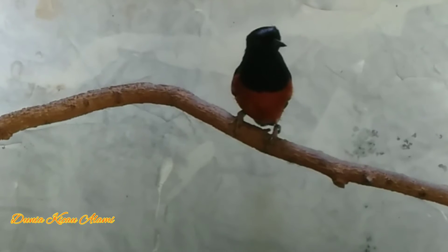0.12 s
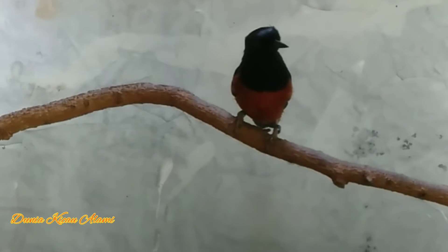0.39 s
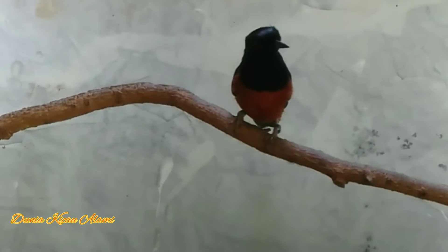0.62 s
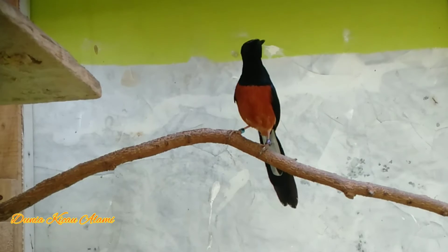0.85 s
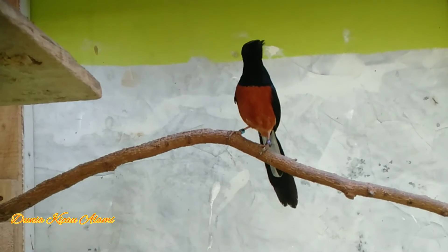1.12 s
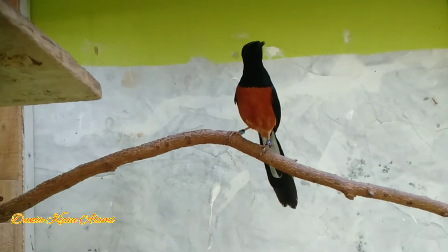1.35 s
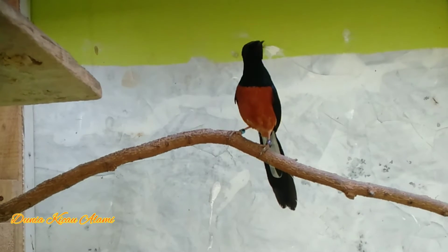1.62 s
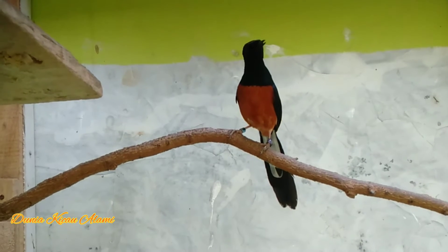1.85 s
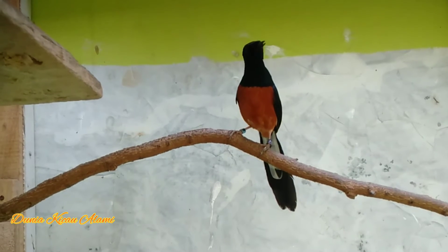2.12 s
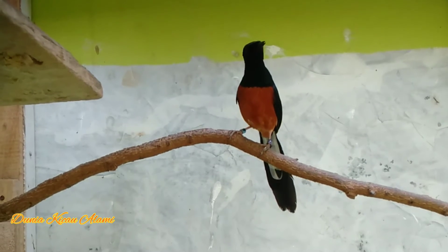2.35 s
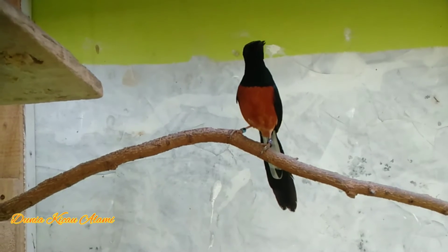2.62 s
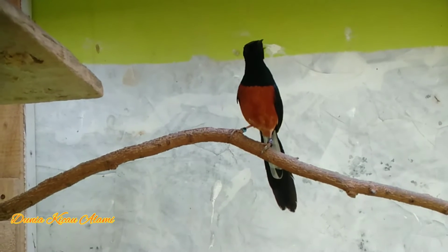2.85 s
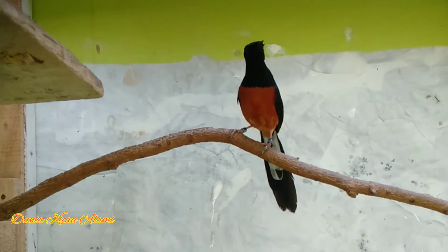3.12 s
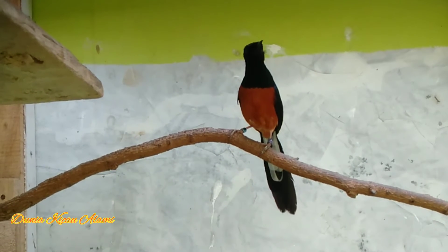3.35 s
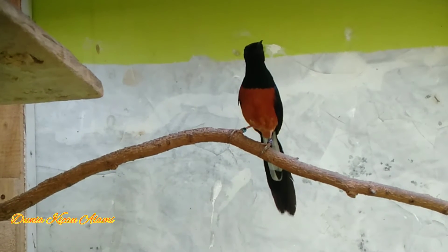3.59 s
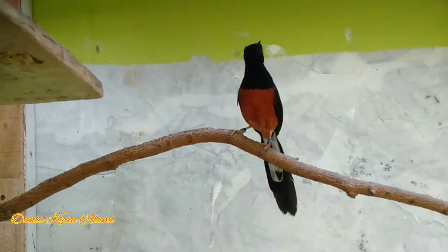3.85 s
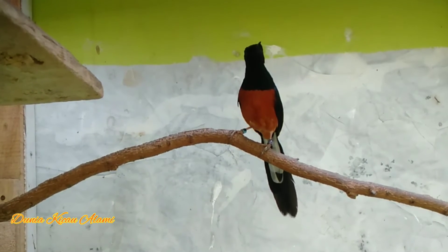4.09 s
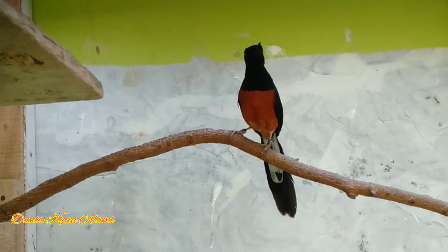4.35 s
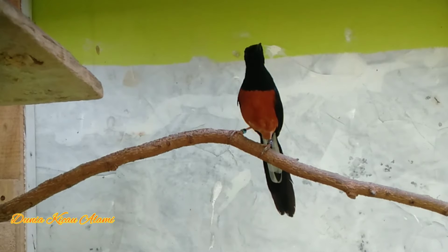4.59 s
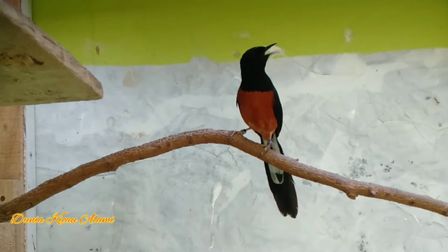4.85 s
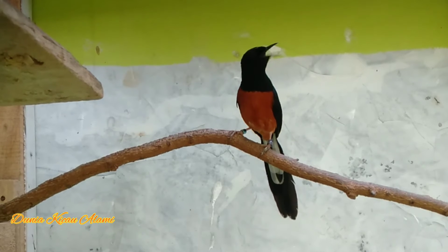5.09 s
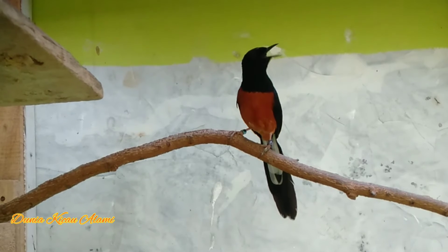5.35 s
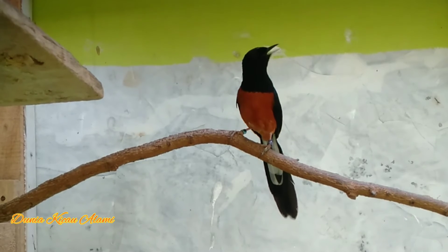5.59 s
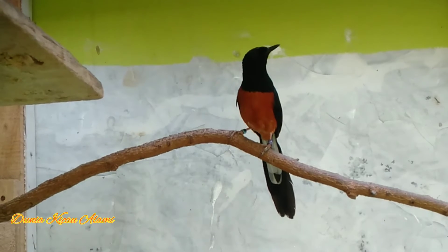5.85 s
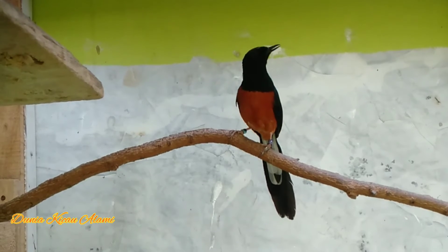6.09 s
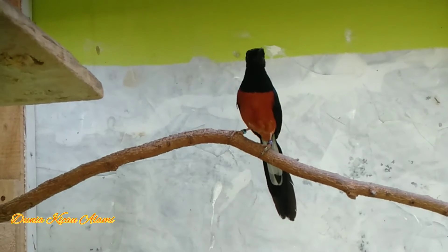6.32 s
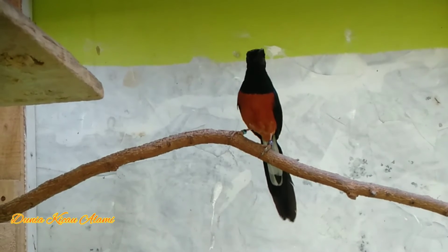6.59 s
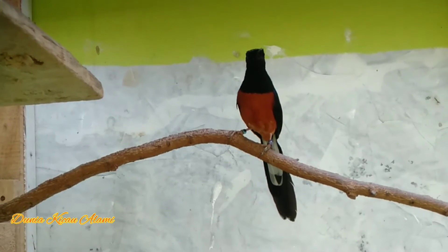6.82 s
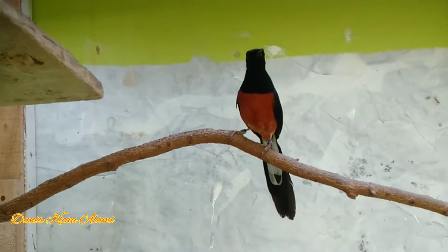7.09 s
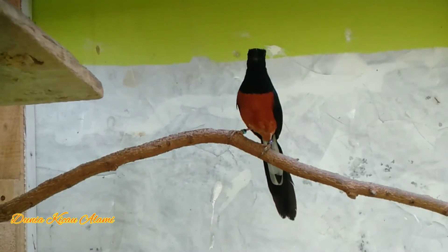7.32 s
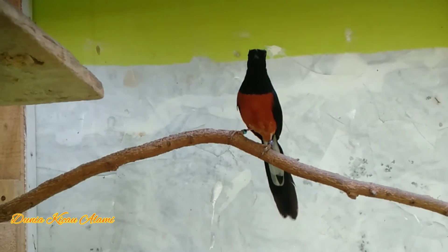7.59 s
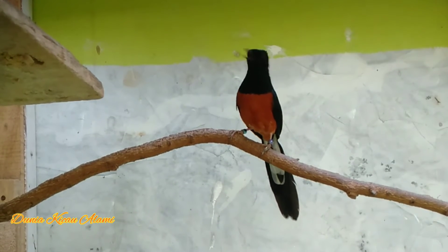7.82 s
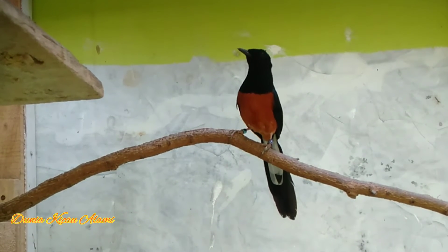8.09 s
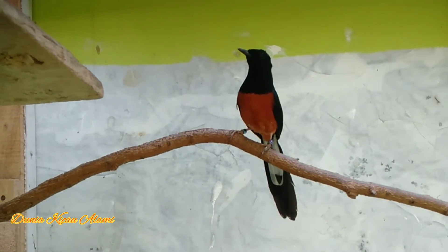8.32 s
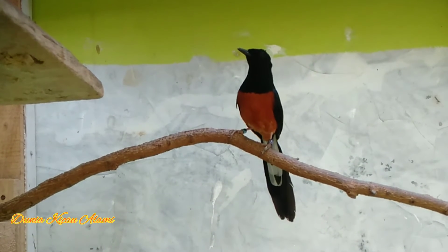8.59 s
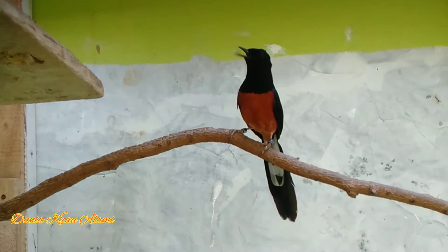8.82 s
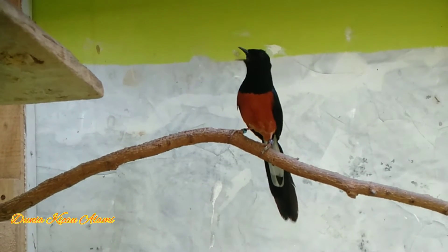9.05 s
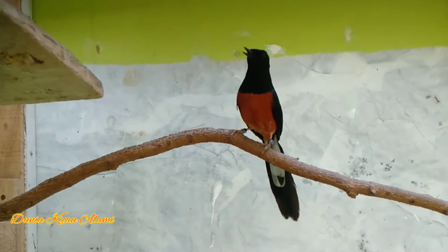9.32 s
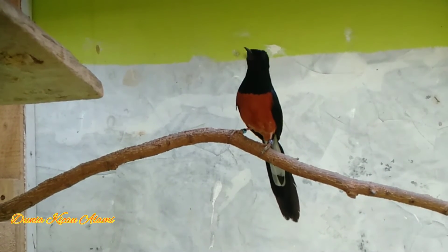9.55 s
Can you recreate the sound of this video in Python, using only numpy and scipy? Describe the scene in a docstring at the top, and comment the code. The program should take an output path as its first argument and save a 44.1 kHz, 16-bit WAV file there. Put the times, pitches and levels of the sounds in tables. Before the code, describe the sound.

Loud shama song indoors: piercing downward chirps, then five rattling trills of tiny arched whistles, slightly overdriven, over faint rumble and hiss.

```python
"""A caged songbird sings close to a small microphone in a hard-walled room: first a run of falling chips,
then five trills of short whistles that arch up and down in pitch. Its notes are stacked sine partials,
shaped by throat and beak and given echoes; the loudest overdrive the microphone. Far off are faint whistles
of two gliding partials, soft thuds and scuffs of fading noise, and a bed of rumble, drone, murmur and hiss."""
import sys
import numpy as np
from scipy import signal
from scipy.fft import rfft, irfft, next_fast_len
from scipy.io import wavfile
from scipy.ndimage import uniform_filter1d, map_coordinates

SR = 44100
rng = np.random.default_rng(int(sys.argv[2]) if len(sys.argv) > 2 else 0)


def invert_db(x):
    """Field ratio 10**(x/20) for x, a level in decibels (scalar or array-like)."""
    u = np.asarray(x, float) / 20
    return 10 ** u


def store_pcm(level_fs):
    """Save levels as 16-bit WAV."""
    pcm = np.round(np.clip(level_fs, -1, 1) * 32767).astype(np.int16)
    wavfile.write(sys.argv[1], SR, np.atleast_2d(pcm).T)


N = 427329

# Falling chips: (start of the slide [s], level before trim [dB])
CHIP_NOTES = [(0.732, -21), (0.84, -19.5), (0.947, -19.5), (1.048, -18), (1.153, -18), (1.258, -19),
              (1.371, -17.5), (1.483, -17.5), (1.576, -16.5), (1.682, -15.5), (1.789, -14.5), (1.878, -14),
              (1.967, -15), (2.056, -15.5), (2.144, -14.5), (2.246, -14.5), (2.356, -15.5), (2.531, -15),
              (2.627, -13.5), (2.729, -13), (2.826, -13.5), (2.906, -14), (2.983, -14), (3.058, -15),
              (3.133, -12.5)]
# Starting pitch over the run, before scatter; it rises, then sinks toward the trill: (time [s], pitch [Hz])
CHIP_START_PITCH = [(.73, 6230), (.95, 6650), (1.3, 6860), (1.9, 7070), (2.73, 7000), (2.95, 6440),
                    (3.13, 5750)]
# Chips that slide on a little further: (index counted from 0)
DEEP_CHIP_INDEX = [7, 9, 13, 16, 17]
# Chip overtones, before scatter: (multiple of the pitch, level [dB])
CHIP_PARTIALS = [(2, -13.5), (3, -19), (4, -46)]
# Soft thin notes of the bird, some of them the catch that opens a trill:
# (start of the slide [s], level [dB], from pitch [Hz], to pitch [Hz], slide length [ms])
PEEP_NOTES = [(.525, -58, 6760, 6600, 51), (.54, -60, 7350, 6720, 126), (.57, -67, 5830, 4560, 250),
              (4.883, -58.5, 2970, 1960, 28), (4.89, -52.5, 3440, 3400, 13), (6.06, -72.5, 6470, 4240, 69),
              (6.168, -62, 3460, 2020, 10), (7.247, -58.5, 2430, 3600, 6.9), (8.685, -59, 2710, 2840, 9.8)]
# Trill notes: (time of the loudness crest [s], level before trim [dB])
TRILL_NOTES = [(3.214, -8.5), (3.275, -9), (3.327, -7.5), (3.379, -9), (3.423, -9), (3.472, -10),
               (3.523, -9.5), (3.577, -11.5), (3.632, -11.5), (3.691, -11), (3.749, -10), (3.805, -10),
               (3.865, -9.5), (3.924, -11), (3.983, -11), (4.043, -10), (4.101, -10.5), (4.161, -10.5),
               (4.217, -11), (4.278, -11), (4.343, -10), (4.406, -12), (4.905, -11), (4.945, -8.5),
               (4.991, -10), (5.039, -10), (5.087, -8.5), (5.138, -8.5), (5.192, -8.5), (5.245, -9),
               (5.3, -9.5), (5.36, -9.5), (5.414, -9), (5.478, -10), (5.538, -10), (5.603, -9),
               (5.664, -11.5), (6.19, -8.5), (6.235, -7.5), (6.276, -14.5), (6.322, -8.5), (6.371, -8),
               (6.421, -6.5), (6.476, -7), (6.529, -6.5), (6.588, -8), (6.644, -6), (6.7, -7.5),
               (6.76, -10.5), (6.813, -11), (6.895, -16), (7.272, -9.5), (7.322, -9.5), (7.369, -9),
               (7.416, -8.5), (7.463, -7.5), (7.513, -9.5), (7.568, -11), (7.622, -10.5), (7.686, -10.5),
               (7.744, -9.5), (7.805, -9), (7.869, -10.5), (8.706, -9), (8.757, -8.5), (8.804, -5),
               (8.856, -5), (8.908, -7), (8.957, -7), (9.008, -8.5), (9.059, -8), (9.119, -9), (9.174, -8),
               (9.233, -7), (9.292, -9), (9.349, -10.5), (9.409, -10), (9.475, -10), (9.542, -11),
               (9.602, -9.5), (9.671, -12)]
# Melody of each trill, mostly sagging as the breath runs out; pitch before scatter, times before stretching:
# (time [s], crest pitch [Hz], rise time [ms], fall time [ms])
TRILL_MELODIES = [
    [(3.215, 4805, 9, 16), (3.277, 4520, 11, 15.6), (3.4, 4450, 15, 14.3), (3.52, 4257, 15, 11.4),
     (3.8, 4142, 14, 14), (4.41, 4001, 11, 17.2)],
    [(4.905, 4736, 20, 13.3), (5.04, 4698, 19, 16.3), (5.089, 4820, 15, 10.4), (5.137, 4483, 13, 10.7),
     (5.36, 4390, 10, 12), (5.663, 4232, 14, 8.5)],
    [(6.19, 4974, 21, 14.2), (6.32, 4760, 21, 13.1), (6.53, 4510, 8.5, 10.5), (6.645, 4496, 9.1, 9.6),
     (6.76, 4267, 17, 9), (6.895, 4102, 14, 14.7)],
    [(7.272, 4240, 25, 8.3), (7.322, 4156, 24, 8.4), (7.416, 4400, 18, 13.5), (7.515, 4356, 15, 14),
     (7.62, 4204, 17, 14), (7.869, 4024, 13, 15.4)],
    [(8.706, 4270, 7, 15), (8.756, 4346, 15, 11.1), (8.856, 4505, 15, 9.6), (8.98, 4312, 16, 9.6),
     (9.1, 4327, 17, 10.7), (9.233, 4358, 12, 11), (9.35, 4280, 14, 12.1), (9.6, 4178, 11, 15),
     (9.671, 4000, 14, 10.3)],
]
# Voicing of each trill: (extra pitch drop at its opening [Hz], octave boost [dB], boost of higher partials [dB])
TRILL_VOICING = [(50, 2, -1), (300, 4.5, 0.5), (320, 0.5, -0.5), (583, -3, -4), (30, -1.5, -3.5)]
# Trill partials before voicing and scatter: (multiple of the pitch, level [dB])
TRILL_PARTIALS = [(1, -0.16), (2, -15.5), (3, -19.5), (4, -27), (5, -43.5)]
# How tightly each trill partial gathers at the crest: (power on the rise, power on the fall)
PARTIAL_NARROWING = [(4, 2.8), (.9, 1.3), (5, 2.6), (5, 2), (5, 2)]
# Airy roughness in the trill notes: (frequency [Hz], relative density [dB per Hz])
BREATH_SPECTRUM = [(1200, -30), (2200, -5), (3000, 3), (5800, -4.5), (9500, -10), (15000, -8)]
# Colour of throat and beak: (frequency [Hz], gain [dB])
THROAT_GAIN = [(2500, 8), (3300, -2), (4200, -1.02), (5200, -5), (7000, -0.5), (9300, -11), (11800, 1),
               (12900, 1.5), (14200, -2.5), (16000, 4.5)]
# The bird shifts its head between phrases: (time [s])
HEAD_TURNS = [0, 3.19, 4.8, 6.0, 7.2, 8.5, 10]
# Near echoes from perch, shelf and walls, before shift and trim: (delay [ms], level [dB])
NEAR_ECHOES = [(0.961, -9.9), (1.703, -9.7), (3.288, -13.9), (4.51, -18.7), (5.215, -14.8), (5.993, -19.1),
               (7.068, -15.8), (9.147, -14.7), (11.077, -15.9), (11.9, -18.8), (13.512, -16.6),
               (14.363, -19.5), (16.209, -20.5), (17.791, -19.8), (19.438, -21.3), (20.313, -20.6)]
# Decay of the diffuse room tail: (frequency [Hz], time to fall 60 dB [s])
ROOM_DECAY = [(500, .4), (3000, .42), (4500, 0.25), (8000, 0.22), (15000, .25)]
# Far whistles, one list each, levels before the room: (time [s], pitch [Hz], level [dB])
WHISTLE_GLIDES = [
    [(.33, 898, -73), (.414, 950, -65), (.55, 972, -75), (.7, 1065, -82)],
    [(7.97, 1026, -74), (8.03, 1223, -73), (8.11, 1402, -70), (8.2, 1424, -108)],
]
# Second partial of each whistle against its first: (level [dB])
WHISTLE_OCTAVES = [-30, 3.5]
# Soft far thuds: (start [s], level before trim [dB], time to fall 60 dB [s])
THUD_HITS = [(0.149, -75.5, 1), (5.719, -66.5, 0.99), (6.207, -50.5, 0.57), (8.145, -67.5, 0.36),
             (8.284, -60.5, 0.4), (8.459, -57.5, 0.37), (8.622, -60, 0.56)]
# Colour of the thuds: (frequency [Hz], relative density [dB per Hz])
THUD_SPECTRUM = [(47, -49), (80, -17), (124, -29.5), (187, -3), (253, -16), (494, -9.5), (827, -9),
                 (1450, -22.5), (3000, -48), (3900, -76.5), (6600, -120)]
# Faint scuffs: (start [s], level before trim [dB])
SCUFF_HITS = [(.96, -63), (1.321, -62.5)]
# Colour of the scuffs: (frequency [Hz], relative density [dB per Hz])
SCUFF_SPECTRUM = [(400, -35), (900, -2), (1400, -2), (2100, -10), (3200, -50)]
# Swells of the low rumble: (time [s], level before trim [dB])
RUMBLE_SWELLS = [(0, -67), (2.51, -64), (3.56, -63.5), (4.43, -59.5), (5.13, -57.5), (5.56, -60),
                 (6.301, -47.5), (6.85, -52), (7.2, -60), (7.5, -52.5), (7.99, -57.5), (8.85, -56),
                 (9.119, -52.5), (9.69, -68)]
# Colour of the rumble: (frequency [Hz], relative density [dB per Hz])
RUMBLE_SPECTRUM = [(12, -50.5), (22, 7.5), (29, -9), (40, -15), (70, -15.5), (130, -21), (250, -68)]
# Swells of the murmuring air, before wavering: (time [s], level [dB])
MURMUR_SWELLS = [(0, -73.5), (1.2, -70), (2.8, -67), (3.5, -74), (4.8, -65), (5.9, -72.5), (8.3, -74.5),
                 (9.69, -78)]
# Colour of the murmur and of the haze under the song: (frequency [Hz], relative density [dB per Hz])
MURMUR_SPECTRUM = [(50, -32), (110, -4), (280, -14), (900, -17), (1800, -19.5), (3000, -22.5),
                   (5000, -74.5)]
# Colour of the steady hiss: (frequency [Hz], relative density [dB per Hz])
HISS_SPECTRUM = [(800, -27.5), (2500, -24), (4100, -7.5), (7000, -7), (15000, -12), (16500, -21)]
# Colour of the grit under loud notes: (frequency [Hz], relative density [dB per Hz])
RASP_SPECTRUM = [(60, 7.5), (500, -3), (1500, -8.5), (3000, -8.5), (6000, -18), (16000, -20.5)]


def bird():
    """Every stretch of song after the first meets slightly shifted near echoes, as the head has turned."""
    peeps = sliding_notes(PEEP_NOTES, [], attack=.3, release=.5, trim_db=0, tremble=.022)
    voice = chips() + peeps + trills()
    track = np.zeros(N)
    for begin, end in zip(HEAD_TURNS, HEAD_TURNS[1:]):
        shift_ms = .015 if begin else 0
        phrase = voice[round(begin * SR):round(end * SR)]
        add(track, begin, room(phrase, early_db=3.5, late_db=-4, shift_ms=shift_ms))
    return track


def chips(end_hz=3463, length_ms=24, scatter=.012, deeper_hz=277, longer_ms=4):
    """Falling slides that land near one pitch, each led by a tiny high tick that glides upward."""
    vary = 1 + scatter * rng.standard_normal((len(CHIP_NOTES), 2))
    is_deep = np.isin(range(len(CHIP_NOTES)), DEEP_CHIP_INDEX)
    slides, ticks = [], []
    for (s, db), (vary_start, vary_end), deep in zip(CHIP_NOTES, vary, is_deep):
        from_hz = vary_start * np.interp(s, *np.transpose(CHIP_START_PITCH))
        to_hz = vary_end * end_hz - deep * deeper_hz
        slides.append((s, db, from_hz, to_hz, length_ms + deep * longer_ms))
        # a tick's level moves 1.5 dB for each dB of its chip
        ticks.append((s - .007, 1.5 * db, .95 * from_hz, 1.1 * from_hz, 7))
    body = sliding_notes(slides, CHIP_PARTIALS, attack=0.35, release=0.32, trim_db=-6, tremble=.012)
    return body + sliding_notes(ticks, [], attack=0.9, release=0.85, trim_db=-8.5, tremble=0.0054)


def sliding_notes(table, overtones, attack, release, trim_db, tremble):
    """Whistles that slide from one pitch to another, with a short hold of pitch at either end."""
    track = np.zeros(N)
    for s, db, from_hz, to_hz, ms in table:
        u = np.linspace(-.1, 1.1, round(1.2 * ms * SR / 1000))  # the slide runs from 0 to 1
        hz = to_hz + (from_hz - to_hz) * (1 - np.clip(u, 0, 1)) ** 1.172  # the slide brakes near its end
        elapsed, left = u - u[0], u[-1] - u
        swell = np.clip(elapsed / attack, 0, 1) * np.clip(left / release, 0, 1) ** 2
        late = np.clip(elapsed / 0.24, 0, 1) ** 2  # overtones ease in behind the fundamental
        partials = [(0.98, swell)]
        for multiple, overtone_db in overtones:
            gain = invert_db(overtone_db + rng.normal(0, 0.5))
            partials.append((round(multiple), swell * late * gain))
        add(track, s - ms / 10000, invert_db(db + trim_db) * syrinx(hz, partials, tremble))
    return track


def trills(early_ms=2.0, brisk=.85, foot_hz=3300, valley_hz=3300, lead=1.1, trail=1.537):
    """Notes climb, crest and drop low; trills after the first start abruptly, and openings drop by their own amount."""
    track = np.zeros(N)
    last, start, phrase = CHIP_NOTES[-1][0], 0, 0
    at, *melody = np.transpose(np.concatenate(TRILL_MELODIES))
    for s, db in TRILL_NOTES:
        crest_hz, rise_ms, fall_ms = (np.interp(s, at, column) for column in melody)
        crest_hz = crest_hz * (1 + .004 * rng.standard_normal())
        fresh = s - last > .2  # a gap this long [s] opens a new trill
        if fresh or not start:
            start = s
        last = s
        phrase += fresh
        since_start = s - start
        opening_hz, octave_db, higher_db = TRILL_VOICING[phrase]

        # time [ms] from the loudness crest; pitch peaks before loudness
        t = np.arange(-lead * rise_ms * SR / 1000, trail * fall_ms * SR / 1000) * 1000 / SR
        from_pitch_peak = t + early_ms
        v = np.where(t < -early_ms, from_pitch_peak / (brisk * rise_ms), from_pitch_peak / (fall_ms + early_ms))
        low_hz = np.where(v < 0, foot_hz, valley_hz - opening_hz * np.exp(-since_start / 0.094))
        arch = np.tanh(1.294 * np.abs(v) ** np.where(v < 0, 2.2, 2.8))
        hz = crest_hz - (crest_hz - low_hz) * arch

        u = np.where(t < 0, t / rise_ms, t / fall_ms)
        bell = np.abs(np.cos(np.pi / 2 * u / np.where(u < 0, lead, trail)))
        # the breath clears by up to 12 dB as the phrase settles
        clearing_db = 12 * (1 - np.exp(-since_start / 0.067))
        breath = invert_db(-36 - clearing_db + rng.normal(0, 4.5)) * bell * coloured(BREATH_SPECTRUM, len(t))
        voiced_db = [0, octave_db] + [higher_db] * (len(TRILL_PARTIALS) - 2)
        partials = []
        for (multiple, partial_db), boost_db, (up, down) in zip(TRILL_PARTIALS, voiced_db, PARTIAL_NARROWING):
            gain = invert_db(partial_db + boost_db + rng.normal(0, 0.53))
            envelope = bell ** np.where(u < 0, up + 3 * fresh, down)
            partials.append((round(multiple), gain * envelope))
        note = syrinx(hz, partials, tremble=0.004) + breath
        add(track, s + t[0] / 1000, invert_db(db - 6) * note)
    return track


def syrinx(hz, partials, tremble):
    """A whistle on the pitch curve hz; every (multiple, gain curve) leaves through the throat and beak."""
    hz = hz * (1 + tremble * wobble(300, len(hz)))
    phase = 2 * np.pi * (np.cumsum(hz) / SR + rng.random())
    voice = 0
    for k, gain in partials:
        in_range = k * hz < SR / 2.3  # partials too high to render fall silent
        voice = voice + gain * invert_db(along(THROAT_GAIN, k * hz)) * in_range * np.sin(k * phase)
    return voice


def room(x, early_db, late_db, shift_ms, size=4096):
    """Adds near echoes and a diffuse noise wash, drawn afresh for each short overlapping stretch of sound."""
    ms, db = np.transpose(NEAR_ECHOES)
    delay = (ms + shift_ms * rng.standard_normal(len(ms))) * SR / 1000
    near = invert_db(db + early_db) @ np.sinc(np.arange(1200) - delay[:, None])  # delays between samples
    near[0] += 1  # direct sound
    x = np.pad(x, (size // 2, size + SR // 2))
    out = signal.fftconvolve(x, near)[:len(x)]
    fade = np.sin(np.pi * np.arange(size) / size)
    for i in range(0, len(x) - SR // 2 - size, size // 2):
        add(out, i / SR, signal.fftconvolve(x[i:i + size] * fade, tail(late_db)))
    return out[size // 2:]


def tail(late_db):
    """The diffuse answer of the room: noise that builds up, then dies at a rate set by frequency."""
    hz, t, z = signal.stft(rng.standard_normal(SR // 2), SR, nperseg=256)
    decay = invert_db(-60 * t / along(ROOM_DECAY, hz)[:, None])
    wash = signal.istft(z * decay, SR, nperseg=256)[1]
    build_up = np.minimum(np.arange(len(wash)) / (0.0031 * SR), 1)
    return invert_db(late_db) * wash / np.linalg.norm(wash) * build_up


def far_whistles():
    """Thin rising tones from far away: two gliding sine partials put through the room."""
    track = np.zeros(N)
    for rows, octave_db in zip(WHISTLE_GLIDES, WHISTLE_OCTAVES):
        s, hz, db = np.transpose(rows)
        t = np.arange(s[0], s[-1], 1 / SR)
        phase = 2 * np.pi * np.cumsum(np.interp(t, s, hz)) / SR
        partials = np.sin(phase) + invert_db(octave_db) * np.sin(2 * phase)
        tone = invert_db(np.interp(t, s, db)) * partials
        add(track, s[0], room(tone, early_db=-36.0, late_db=-2.5, shift_ms=.3))
    return track


def thuds():
    """Dull blows in another room: low noise that starts fast and dies away."""
    track, t = np.zeros(N), np.arange(SR // 2) / SR
    for s, db, t60 in THUD_HITS:
        onset = 1 - np.exp(-t / 0.0062)
        add(track, s, invert_db(db + 8 - 60 * t / t60) * onset * coloured(THUD_SPECTRUM, len(t)))
    return track


def scuffs(rise_s=0.019, t60=0.23):
    """Short soft rustles: midrange noise with a gentle onset and an exponential fade."""
    track, t = np.zeros(N), np.arange(SR // 2) / SR
    for s, db in SCUFF_HITS:
        onset = 1 - np.exp(-t / rise_s)
        add(track, s, invert_db(db + 9 - 60 * t / t60) * onset * coloured(SCUFF_SPECTRUM, len(t)))
    return track


def rumble(drone_hz=29.2, drone_db=-7):
    """Low noise that swells and fades, with a drone inside it that wavers in pitch and level."""
    drone_phase = 2 * np.pi * np.cumsum(drone_hz * (1 + .05 * wobble(2, N))) / SR
    drone = invert_db(drone_db + 2.5 * wobble(12, N)) * np.sin(drone_phase)
    noise = invert_db(2.1 * wobble(3.7, N)) * coloured(RUMBLE_SPECTRUM, N)
    swell_db = np.interp(np.arange(N) / SR, *np.transpose(RUMBLE_SWELLS))
    return invert_db(swell_db - 1.5) * (noise + drone)


def murmur():
    """Murmuring air: low to middle noise on a slow, wavering level curve."""
    swell_db = np.interp(np.arange(N) / SR, *np.transpose(MURMUR_SWELLS))
    return invert_db(swell_db + 0.9 * wobble(6.3, N)) * coloured(MURMUR_SPECTRUM, N)


def hiss():
    """Steady treble-heavy noise."""
    return invert_db(-77.0) * coloured(HISS_SPECTRUM, N)


def unit(x):
    """Scaled to rms 1."""
    return x / np.sqrt(np.mean(x ** 2) + 1e-20)


def along(points, hz):
    """Reads (frequency [Hz], value) points on a log frequency axis."""
    f, v = np.transpose(points)
    return np.interp(np.log(hz + 1), np.log(f + 1), v)


def wobble(rate, size):
    """A smooth random curve, rate knots a second."""
    knots = rng.standard_normal(int(size * rate / SR) + 4)
    return map_coordinates(knots, [np.arange(size) * rate / SR])


def coloured(spectrum, size):
    """Noise of rms 1 with the given spectrum."""
    m = next_fast_len(size + 8192)
    gain = invert_db(along(spectrum, np.fft.rfftfreq(m, 1 / SR)))
    return unit(irfft(rfft(rng.standard_normal(m)) * gain, m)[:size])


def add(track, s, x):
    """Mixes x into the track from time s [s]."""
    part = track[round(s * SR):][:len(x)]
    part += x[:len(part)]


def scene():
    """The bird near, the rest far."""
    background = rumble() + murmur() + hiss()
    return (bird() + far_whistles() + thuds() + scuffs() + background)[None]


def roll_off(x):
    """The treble ends steeply here."""
    return signal.sosfilt(signal.butter(12, 16820, fs=SR, output="sos"), x)


def record(dry, knee=12, lopsided=0.1, rasp_db=-33, thump_db=-38, haze_db=-57, haze_power=0.47):
    """The capsule bends unevenly, rasps as it is driven and flattens the loudest crests, one side first."""
    top, uneven = .32, .012  # mean ceiling of the capsule, and its offset either way
    drive = np.sqrt(np.abs(uniform_filter1d(dry ** 2, size=70))) / top
    # the grit grows much faster than the note
    rasp = invert_db(rasp_db + 5.7 * wobble(25, N)) * drive ** 6 * coloured(RASP_SPECTRUM, N)
    # the diaphragm is pushed off centre at the crests
    thump = invert_db(thump_db + 1.3 * wobble(3.6, N)) * drive ** 4
    # a low haze swells with the song
    slow_drive = np.sqrt(np.abs(uniform_filter1d(dry ** 2, size=600))) / top
    haze = invert_db(haze_db + 1.5 * wobble(20, N)) * slow_drive ** haze_power * coloured(MURMUR_SPECTRUM, N)
    bent = dry + lopsided * dry ** 2 + rasp + thump + haze
    ceiling = top + uneven * np.sign(bent)
    flat = bent / (1 + np.abs(bent / ceiling) ** knee) ** (1 / knee)
    lowpass = signal.ellip(10, .2, 60, 16000, fs=SR, output="sos")  # steep treble limit at 16 kHz
    finished = signal.sosfilt(lowpass, flat)
    return roll_off(finished)


dry = scene()
out = record(dry)
store_pcm(out)
```